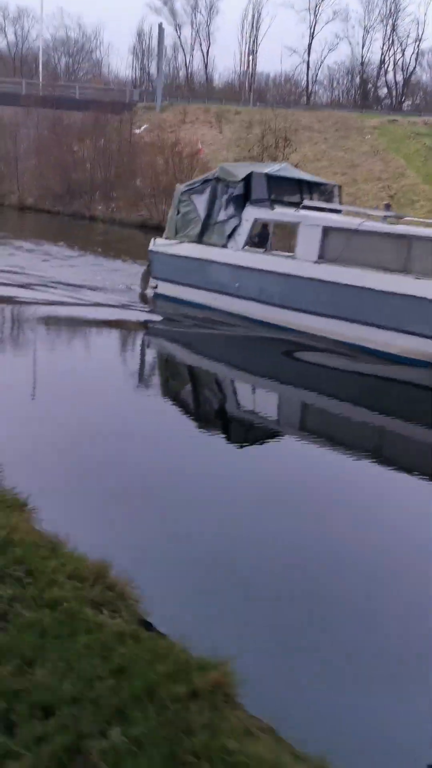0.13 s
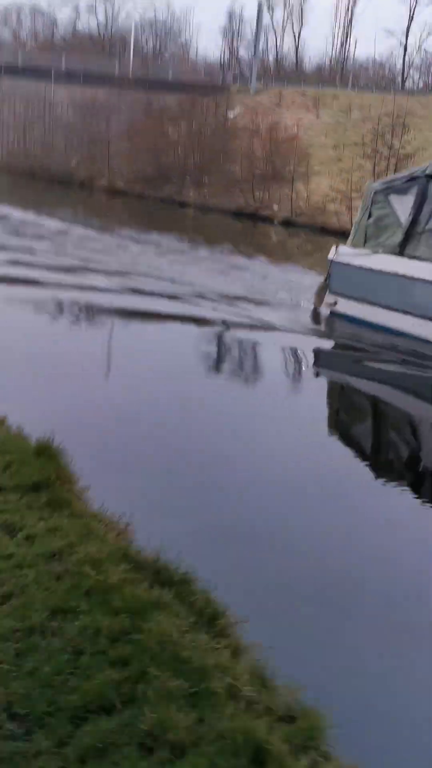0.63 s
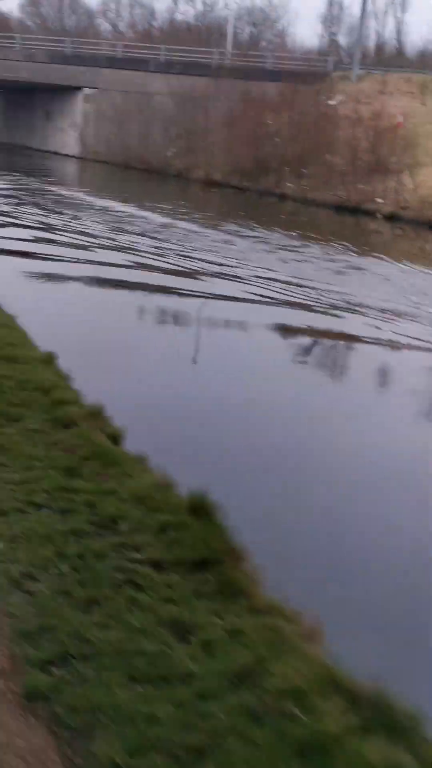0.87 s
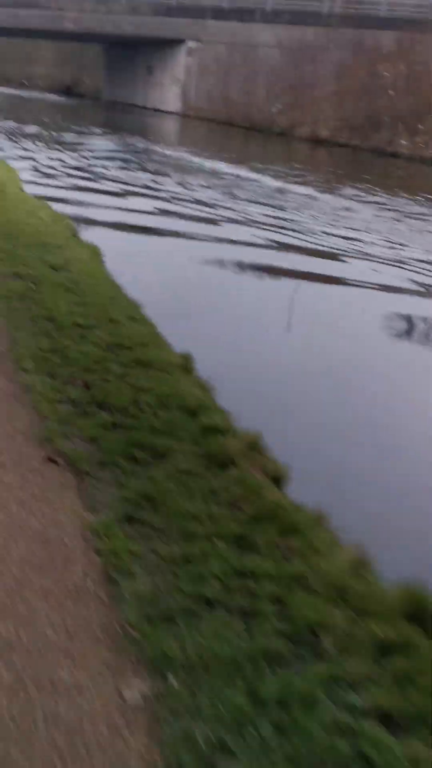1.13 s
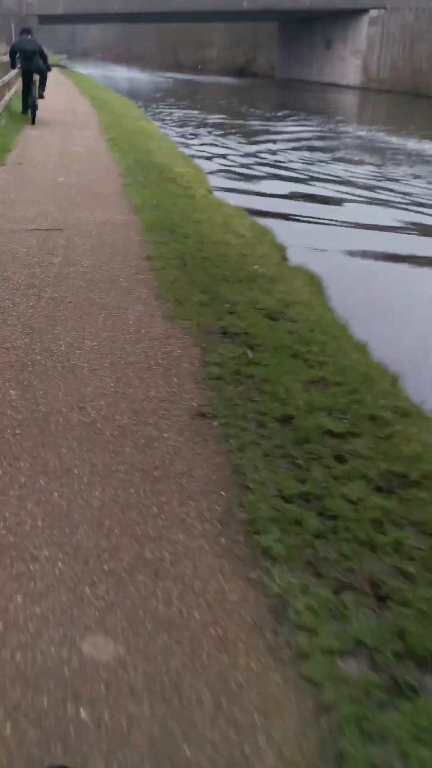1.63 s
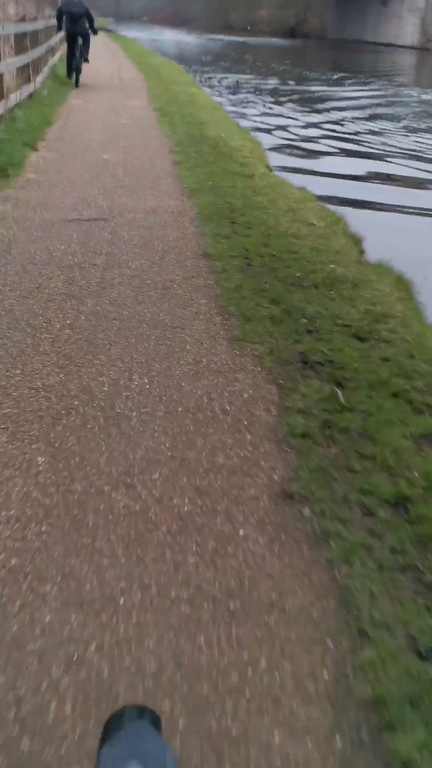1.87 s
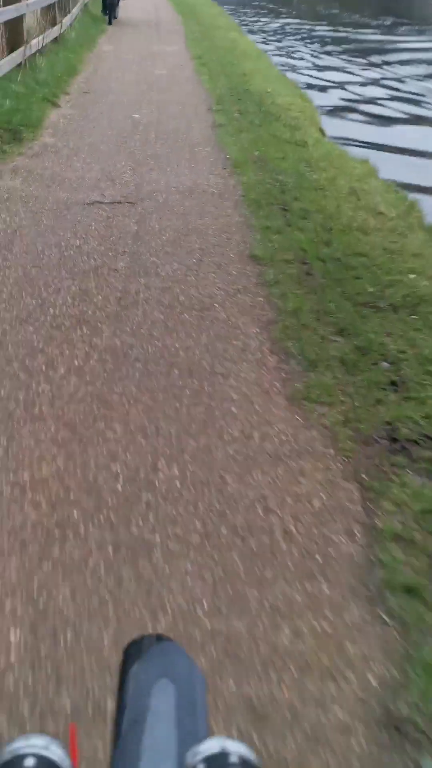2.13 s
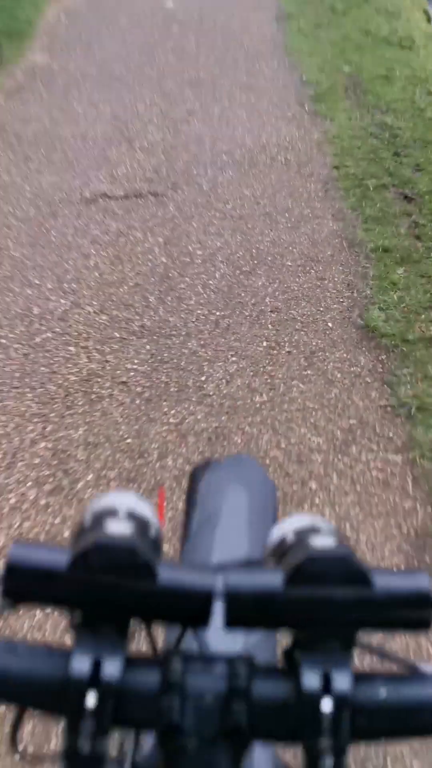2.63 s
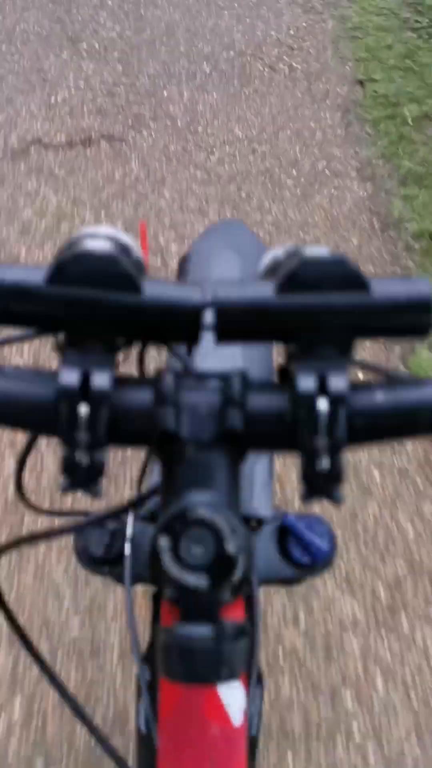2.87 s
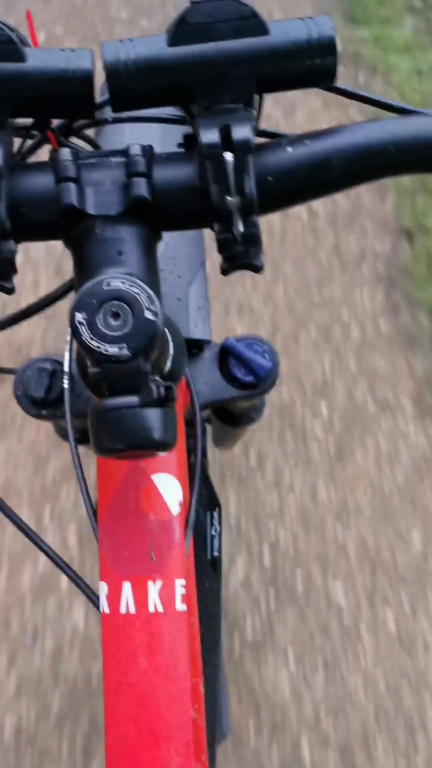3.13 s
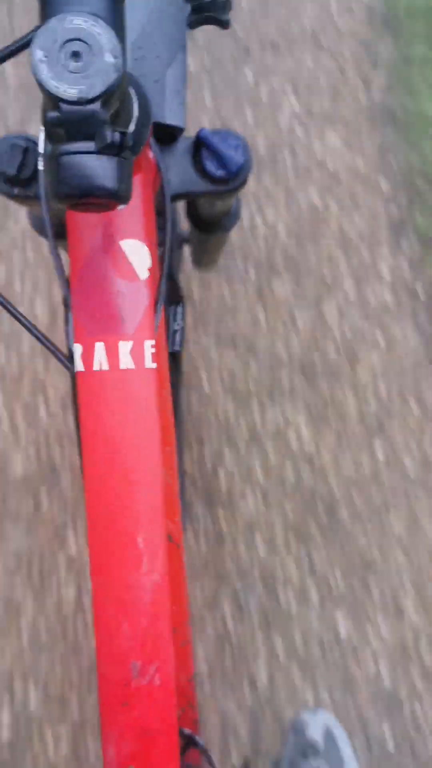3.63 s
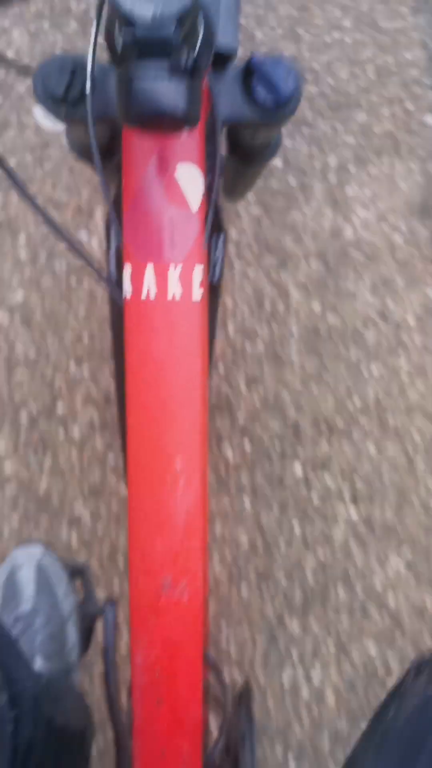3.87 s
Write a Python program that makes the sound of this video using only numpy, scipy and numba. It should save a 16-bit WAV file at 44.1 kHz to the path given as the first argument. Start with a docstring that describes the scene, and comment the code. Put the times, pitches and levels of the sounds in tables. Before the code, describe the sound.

Wind buffeting hits the microphone hard from 0 to 0.9 s, deep rumble and blunt pops switching between left and right. Gritty tyre hiss continues throughout, brighter on the left, with small ticks, sharpest near 1.07, 1.25 and 1.9 s. A very faint high whine slides down until about 3 s. Weaker puffs continue, mostly right; low hum swells at 2.2-3 s. Finger thumps at 3.84 and 3.96 s end in rubbing.

```python
"""Windy ride on a gravel towpath

A phone held on a bicycle: wind buffets its two microphone ports separately, as banded noise and pressure puffs.
Tyres hiss as coloured noise with grains of grit, and grit ticks on the frame as short resonances.
A low hum and faint drones waver; a thin whine (perhaps an electric drive) slides down as paired tones.
Near the end a finger bumps and rubs the right port; a gain control ducks the loudest moments."""
import sys
import numpy as np
from scipy import signal
from scipy.fft import rfft, irfft
from scipy.io import wavfile
from scipy.ndimage import uniform_filter1d, minimum_filter1d
from numba import njit

SR = 44100
rng = np.random.default_rng(int(sys.argv[2]) if len(sys.argv) > 2 else 0)


def undo_db(level):
    """Turn decibels back into plain size, where 20 dB means ten times bigger."""
    steps = np.asarray(level, float) / 20
    return 10 ** steps


def generate_wav(signal):
    """Clip the signal to [-1, 1] and save it as 16-bit WAV at the path in sys.argv[1]."""
    frames = np.transpose(np.atleast_2d(signal))
    scaled = np.clip(frames, -1, 1) * 32767
    pcm = np.round(scaled).astype(np.int16)
    wavfile.write(sys.argv[1], SR, pcm)


N = 176400


def unit(x):
    """Scale to rms 1."""
    return x / np.sqrt(np.mean(x ** 2))


def on_log(table, hz):
    """Read a (frequency [Hz], value) table on a logarithmic frequency axis."""
    a = np.array(table, float)
    return np.interp(np.log(hz), np.log(a[:, 0]), a[:, 1])


def coloured(noise, colour):
    """Filter noise to a (frequency [Hz], density [dB per Hz]) colour."""
    hz = np.fft.rfftfreq(N, 1 / SR) + 1
    return irfft(rfft(noise) * undo_db(on_log(colour, hz)), N)


def curve(table, col=1):
    """Read a column of a time table at every sample."""
    a = np.array(table, float)
    return np.interp(np.arange(N) / SR, a[:, 0], a[:, col])


def walk(rate):
    """Random levels held about 1 / rate seconds and slewed; spread 1."""
    k = max(int(1000 / rate), 2)  # hold [ms]
    steps = np.repeat(rng.standard_normal(400), k)
    slow = uniform_filter1d(uniform_filter1d(steps, k), k)[:N * 1000 // SR + 2]
    return np.interp(np.arange(N) * (1000 / SR), np.arange(len(slow)), unit(slow))


def bands(x, centres, step):
    """Split x into overlapping raised-cosine bands that reach step octaves to each side."""
    spec = rfft(x)
    octave = np.log2(np.fft.rfftfreq(N, 1 / SR) + 1e-9)
    for hz in centres:
        distance = np.clip((octave - np.log2(hz)) / step, -1, 1)
        yield hz, irfft(spec * np.cos(np.pi / 2 * distance) ** 2, N)


def blur(width_hz):
    """Complex noise of rms 1 that spreads a tone over width_hz."""
    z = rng.standard_normal(N) + 1j * rng.standard_normal(N)
    z = signal.lfilter(*signal.butter(1, width_hz / 2, fs=SR), z)
    return z / np.sqrt(np.mean(np.abs(z) ** 2))


def port(x):
    """A microphone port leaks slow pressure away, as a first-order high-pass."""
    return signal.lfilter(*signal.butter(1, 65.6, "high", fs=SR), x)


def drones():
    """Fainter tones of the surroundings: narrow noise bands that come and go, alike on both ports."""
    # columns: (frequency [Hz], level [dB], width [Hz])
    tones = [(425, -56, 6.9), (508, -53.5, 6.9), (847, -60, 26), (2100, -72, 9)]
    t = np.arange(N) / SR
    return sum(undo_db(db) * np.imag(blur(wide) * np.exp(2j * np.pi * hz * t)) for hz, db, wide in tones)


def hum():
    """A low drone, the same on both ports: steady partials plus wavering rests, drifting in pitch together."""
    # partials of the hum: (frequency [Hz], level [dB], steady share, width of the wavering rest [Hz])
    partials = [(92, -36, 2.6, 8.6), (185, -60, 0.45, 25), (276.8, -44, 1.4, 15)]
    # swell added to every partial: (time [s], level [dB])
    swell = [(0, -11), (1.5, -14.5), (2.2, 1.5), (3.0, 0.5), (3.3, -5.5), (4, -2.5)]
    drifting_time = np.cumsum(1 + 0.00764 * walk(2.983)) / SR
    out = 0
    for hz, db, steady, wide in partials:
        gain = undo_db(db + curve(swell) + 1.5 * walk(12))
        tone = np.exp(2j * np.pi * hz * drifting_time)
        out = out + gain * np.imag((steady + blur(wide)) * tone)
    return out


def whine():
    """Two falling pairs of thin, fluttering tones, each part clean and part blurred by noise."""
    # glide: (time [s], centre of the first order [Hz], first order level [dB], second order level [dB])
    glide = [(0, 18300, -71, -70), (.25, 16150, -72, -70), (.4, 14900, -67.5, -70), (.84, 12560, -68, -70),
             (1.25, 10100, -65.5, -67), (1.62, 8260, -65.5, -71), (2.08, 6250, -66.5, -69),
             (2.25, 6100, -66, -68), (2.4, 5970, -69.5, -75), (2.9, 5600, -75, -73), (3.1, 5460, -79, -83),
             (4, 5000, -86, -84)]
    split_hz, width_hz = 600, 180  # each order lies split_hz to either side of its centre
    flutter_db, left_db, clean_share = 2.5, -1.5, 0.67
    out = 0
    for order in 1, 2:
        for sign in -1, 1:
            hz = order * curve(glide) + sign * split_hz
            audible = hz < SR / 2.5  # silent near the top of the band
            gain = undo_db(curve(glide, col=order + 1) + flutter_db * walk(40)) * audible
            tone = np.exp(2j * np.pi * np.cumsum(hz) / SR) * gain
            out = out + np.array([np.imag(tone * (clean_share + blur(width_hz))) for _ in range(2)])
    return out * undo_db(np.array([[left_db], [0]]))


def airy():
    """A swelling band of airy noise that only the right port hears."""
    # swell: (time [s], level [dB])
    swell = [(0, -75), (1.5, -79), (2.4, -72), (2.7, -80), (2.95, -69), (3.15, -67), (3.3, -59), (3.5, -69),
             (4, -69)]
    centre_hz, width_hz = 9460, 2100
    edges = [centre_hz - width_hz / 2, centre_hz + width_hz / 2]
    band = signal.butter(2, edges, "band", fs=SR, output="sos")
    noise = unit(signal.sosfilt(band, rng.standard_normal(N)))
    return noise * undo_db(curve(swell) + 2.0 * walk(13))


def tyres():
    """Rolling hiss roughened by random grains of grit, coloured differently at the two ports."""
    # strength of the roll: (time [s], level [dB])
    roll_level = [(0, -63.5), (.7, -63), (.9, -64), (1.1, -61), (1.27, -62), (1.4, -62.5), (1.95, -60.5),
                  (2.3, -60), (2.55, -59), (2.75, -60), (2.9, -60), (3.1, -59.5), (3.3, -59.5), (4, -60)]
    # colour at each port: (frequency [Hz], density [dB per Hz])
    left_colour = [(300, 14), (600, 11), (1000, 12.5), (1600, 4.5), (2500, 2.5), (4000, -5), (7000, -7),
                   (9000, -10.5), (12000, -19), (15500, -16)]
    right_colour = [(300, 19), (600, 14), (1000, 6.5), (1600, -2.5), (2300, -7), (3200, -20), (5000, -27),
                    (7500, -35), (11000, -22), (15500, -36)]
    # how each pitch follows the roll: (frequency [Hz], change [dB per dB])
    follow = [(500, 0.06), (1300, 0.23), (2200, 1.6), (4000, 1.16), (10000, 1.3)]
    base_db, mean_roll_db = -45, -61
    flicker_db, shared_db, alike = 0.51, 1.31, 0.17  # alike: share of noise common to both ports
    grit_per_s, grit_spread_db, grit_most_db, grit_share = 600, 4.5, 19.5, 0.21
    roll = curve(roll_level) - mean_roll_db
    shared = walk(12)
    grain_db = np.minimum(grit_spread_db * rng.exponential(size=N), grit_most_db)
    grit = (rng.random(N) < grit_per_s / SR) * undo_db(grain_db)
    grit = signal.lfilter([1], [1, -.97], grit)  # each grain dies away
    common = rng.standard_normal(N)
    out = []
    for colour in left_colour, right_colour:
        noise = unit(alike * common + rng.standard_normal(N))
        noise = coloured(noise * (1 + grit_share * grit / np.std(grit)), colour)
        hiss = 0
        for hz, band in bands(noise, 300 * 2 ** np.arange(0, 6.5, .5), 0.51):
            db = base_db + on_log(follow, hz) * roll + shared_db * shared + flicker_db * walk(18)
            hiss = hiss + band * undo_db(db)
        out.append(hiss)
    return np.array(out)


def ticks():
    """Grit ticks on the frame, nearer the left port: noise and a snap excite a short, broad resonance."""
    # ticks: (time [s], level of the ring before its rise and decay [dB], pitch [Hz])
    hits = [(0.09, -46.5, 7100), (.132, -41, 3170), (0.175, -44, 6100), (0.315, -51, 8240),
            (0.382, -44.5, 7600), (.57, -48, 4200), (.586, -47, 7000), (.655, -44.5, 4170),
            (.762, -51, 5000), (1.065, -37, 2630), (1.0695, -32, 2600), (1.069, -46, 4480),
            (1.078, -43.5, 4300), (1.243, -38.5, 2590), (1.25, -46, 2580), (1.24, -48, 6300),
            (1.253, -47, 8200), (1.262, -44, 7400), (1.268, -49, 4200), (1.271, -48, 7000),
            (1.913, -38, 3000), (3.006, -53, 10900)]
    t60_s, rise_s, right_db = 0.018, .0005, -20
    width, snap = 0.34, 4  # width as a share of the pitch; height of the impulse
    length = 1500  # samples
    out, t = np.zeros(N), np.arange(length) / SR
    envelope = np.tanh(t / rise_s) * undo_db(-60 * t / t60_s)
    for s, db, hz in hits:
        strike = rng.standard_normal(length) + snap * (np.arange(length) == 20)
        peak = signal.iirpeak(hz, 1 / width, fs=SR)
        ring = signal.lfilter(*peak, signal.lfilter(*peak, strike))
        start = int(s * SR)
        out[start:start + length] += undo_db(db) * unit(ring) * envelope
    return out * undo_db(np.array([[0], [right_db]]))


def add_puff(out, s, db, ms):
    """Add one bell-shaped pressure puff centred at s, ms wide at half its height."""
    k = np.arange(-400, 401)
    i = np.clip(int(s * SR) + k, 0, N - 1)
    out[i] += undo_db(db) * np.exp(-.5 * (k / SR * 2355 / ms) ** 2)


def wind(side):
    """Turbulence on one port (0 left, 1 right): rumble that brightens in gusts, plus sharp pressure puffs."""
    # gusts: (time [s], level [dB], left minus right [dB])
    gusts = [(0.02, -23.5, -3.5), (0.08, -30, 6), (0.18, -17.5, -12.5), (0.27, -23, 16), (0.31, -35, -5),
             (0.4, -29, 6.5), (0.455, -26.5, 14), (0.52, -22, -10.5), (0.58, -33, 6.5), (0.66, -25, 17),
             (0.7, -39, 29), (0.75, -28, 15), (0.83, -22.5, -15.0), (0.86, -29, -8.5), (0.96, -31.5, -3),
             (1.0, -32, 8), (1.29, -35.5, 20), (1.38, -44, 21), (1.42, -35, 6.5), (1.6, -36.5, 6),
             (1.62, -29.5, -8), (1.65, -29, 5.5), (2.04, -28, -4), (2.06, -36, 26), (2.11, -26, -9.5),
             (2.15, -37, 4), (2.2, -31, -8), (2.24, -28.5, 10), (2.28, -30, -16.5), (2.51, -34.5, -3.5),
             (2.64, -30.5, -18), (2.76, -35, -21.5), (2.78, -32, -4), (2.9, -31.5, 0), (2.97, -30.5, -13.5),
             (3.09, -38, -0.5), (3.16, -35.5, 15.5), (3.18, -43.5, 8.5), (3.24, -30.5, -8),
             (3.4, -31, -11.5), (3.42, -32, 3), (3.53, -34, -6), (3.6, -36.5, 1), (3.63, -35, 4),
             (3.8, -37.5, 1.5)]
    # colour at a mean gust: (frequency [Hz], density [dB per Hz])
    colour = [(20, -6.5), (35, -0.5), (60, -0.5), (95, -2.5), (150, -12.5), (250, -20), (400, -35),
              (650, -49.5), (1000, -55)]
    # how each pitch follows the gust: (frequency [Hz], change [dB per dB])
    follow = [(25, 0.3), (80, 0.53), (200, 0.9), (500, 0.96)]
    # strongest puffs on each port: (time [s], peak before the port leak [dB], push 1 or pull -1, width [ms])
    left_puffs = [(0.1, -6.5, 1, 2.2), (0.19, -12, 1, 1.7), (0.225, -7, 1, 1.9), (0.2419, -1, -1, 1.75),
                  (0.2766, -3.5, -1, 1.9), (0.289, -4, -1, 2.4), (0.3562, -13, 1, 2.8), (0.409, -7, 1, 3.2),
                  (0.4426, -14, 1, 2.4), (0.4458, -6.5, -1, 1.7), (0.4482, -14, 1, 0.74),
                  (0.4547, -10, 1, 2.3), (0.4567, -5.5, -1, 1.27), (0.4593, -5.5, 1, 2.2),
                  (0.467, -23, 1, 0.69), (0.4756, -8, 1, 2.7), (0.651, -23, -1, 2.5),
                  (0.749, -6.5, -1, 3.1), (0.7632, -5, 1, 2.4), (1.1639, -10.5, 1, 1.85),
                  (1.6499, -13.5, 1, 2.4), (1.682, -14, 1, 2.2), (1.7023, -7, 1, 2.4), (2.252, -17, 1, 3.4)]
    right_puffs = [(0.144, -17, 1, 2.2), (0.169, -15, 1, 1.6), (0.1963, -7, 1, 2.2), (0.217, -16, 1, 2.8),
                   (0.5096, -12, 1, 1.9), (0.529, 1.5, 1, 2.6), (0.811, -19, 1, 1.8), (0.842, -29, -1, 1.8),
                   (0.8605, -13, 1, 1.25), (0.8668, -6, 1, 1.26), (1.4223, -9, -1, 1.08),
                   (1.7137, -7, 1, 2.6), (1.8059, -5.5, -1, 1.6), (1.9189, -13, 1, 1.5),
                   (1.9957, -15.5, 1, 0.76), (2.0185, -9.5, -1, 1.8), (2.032, -16, 1, 0.93),
                   (2.1076, 1.5, 1, 1.17), (2.2754, -14, 1, 1), (2.3059, -13, 1, 0.98),
                   (2.4138, -5, 1, 2.46), (2.4546, -10, 1, 1.14), (2.6019, -7, 1, 1.3),
                   (2.641, -10, 1, 1.6), (2.6595, -8, -1, 1.34), (2.701, -24, -1, 2.6),
                   (2.7212, -11, -1, 1.7), (2.752, -2.5, -1, 2.27), (2.7817, -14, -1, 1.7),
                   (2.9436, -9.5, 1, 1.4), (2.995, -9.5, 1, 2.2), (3.2432, -12, 1, 0.98),
                   (3.2693, -7.5, 1, 1.2), (3.2906, -11.5, 1, 1.06), (3.3484, -9, 1, 1.7),
                   (3.369, -15, -1, 1.2), (3.3821, -10.5, 1, 1.08)]
    rumble_db, mean_gust_db, eddy_db, swirl_db = -19.5, -28.5, 2, 2
    small_puffs, puff_spread_db = 300, 3
    small_db, small_ms = (-24.5, -29.5)[side], (3.15, 1.37)[side]  # left, right

    gust = curve(gusts) - mean_gust_db + (.5 - side) * curve(gusts, col=2)
    swirl = walk(14)
    rumble = 0
    for hz, band in bands(rng.standard_normal(N), 20 * 2 ** np.arange(0, 6, .5), 0.53):
        db = on_log(colour, hz) + on_log(follow, hz) * (gust + swirl_db * swirl)
        rumble = rumble + band * undo_db(db + eddy_db * walk(9 + hz / 20))
    rms = np.sqrt(np.mean(undo_db(on_log(colour, np.linspace(10, SR / 2, 9999))) ** 2))

    push, pull = np.zeros(N), np.zeros(N)
    for s, db, sign, ms in (left_puffs, right_puffs)[side]:
        add_puff(push if sign > 0 else pull, s, db, ms)
    for when, size, wide in rng.random((small_puffs, 3)):
        # few small puffs are strong, and gusts strengthen them
        db = small_db + gust[int(when * N)] - puff_spread_db * np.log(size + 0.0014)
        add_puff(push, when * N / SR, db, small_ms * (0.65 + wide))
    return rumble / rms * undo_db(rumble_db) + port(push - pull)


def finger():
    """The finger presses on the port ever harder and lets go; from the last bump on, skin rubs over it."""
    # bumps: (time [s], level before growth and leaks [dB], length [ms], edge [ms], let-go [ms])
    bumps = [(3.8428, 18.5, 2.23, 0.16, 0.35), (3.845, 13.5, 0.87, 0.14, 0.28),
             (3.956, 13.5, 3.24, 0.79, 1.46)]
    # colour of the rubbing skin: (frequency [Hz], density [dB per Hz])
    skin_colour = [(120, -19), (300, -5.5), (550, -1), (800, -1.5), (1000, -10), (1300, -9.5),
                   (1800, -18.5), (2200, -20), (2900, -30), (3200, -37), (6000, -72)]
    lead_ms, lead_share = 8.1, 0.13  # pressure creeps up ahead of the edge
    press_from, press_growth, seal_hz = 0.36, 0.92, 25
    rub_s, rub_db, rub_rise_s, slips_per_s = 3.956, -16, 0.0088, 9000
    t, pressure = np.arange(N) / SR, 0
    for s, db, ms, edge_ms, go_ms in bumps:
        late = 1000 * (t - s)  # ms after the edge
        press = (np.tanh(late / edge_ms) - np.tanh((late - ms) / go_ms)) / 2
        lead = lead_share * np.exp(np.minimum(late, 0) / lead_ms) * (1 - np.tanh(late / edge_ms)) / 2
        pressure = pressure + undo_db(db) * (lead + press * (press_from + press_growth * late / ms))
    leak = signal.butter(1, seal_hz, "high", fs=SR)  # the seal of the skin lets pressure escape
    thump = port(signal.lfilter(*leak, pressure))
    slips = (rng.random(N) < slips_per_s / SR) * rng.standard_normal(N)
    skin = unit(coloured(slips, skin_colour))
    return thump + undo_db(rub_db) * skin * np.clip((t - rub_s) / rub_rise_s, 0, 1)


def scene():
    """All sources at the two ports, with the finger on the right one."""
    # level of everything but the finger at the right port, rising at the end: (time [s], level [dB])
    right_level = [(0, -0.5), (3.865, -0.5), (3.885, 1), (4, 4)]
    out = drones() + hum() + whine() + tyres() + ticks() + np.array([wind(0), wind(1)])
    out[1] += airy()
    out[1] *= undo_db(curve(right_level))
    out[1] += finger()
    return out


@njit
def hold(peak, keep):
    """Follow peaks at once, let go slowly."""
    out, e = np.empty(len(peak)), 0.
    for i in range(len(peak)):
        e = max(peak[i], e * keep)
        out[i] = e
    return out


def low_pass(x):
    """Removes everything above the highest recorded frequency."""
    return signal.sosfilt(signal.butter(12, 15830, fs=SR, output="sos"), x)


def record(dry):
    """A look-ahead gain control turns both channels down together when peaks pass its knee."""
    knee, ratio = 0.55, 3.34  # knee as a share of full scale
    ahead_s, attack_s, release_s = 0.0039, 0.011, 0.15
    k = int(ahead_s * SR)
    peak = -minimum_filter1d(-np.abs(dry).max(axis=0), 2 * k + 1)  # highest peak nearby
    held = hold(peak, np.exp(-1 / (release_s * SR)))
    envelope = uniform_filter1d(held, int(attack_s * SR))
    gain = np.minimum(1, knee / (envelope + 1e-9)) ** (1 - 1 / ratio)
    return low_pass(np.clip(dry * gain, -1, 1))


dry = scene()
out = record(dry)
generate_wav(out)
```